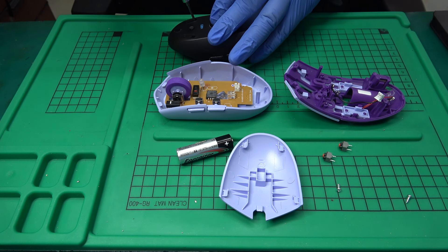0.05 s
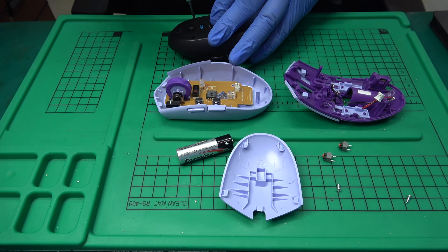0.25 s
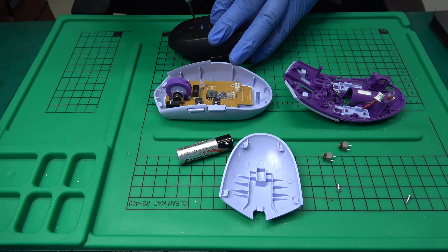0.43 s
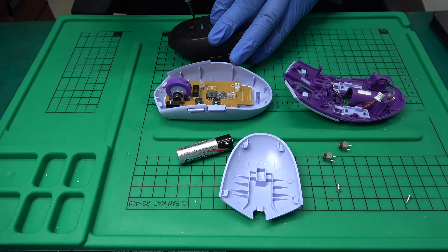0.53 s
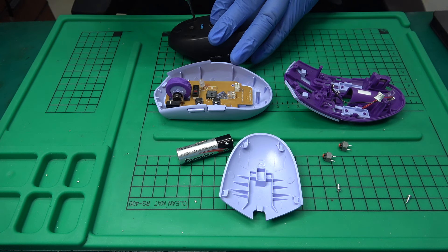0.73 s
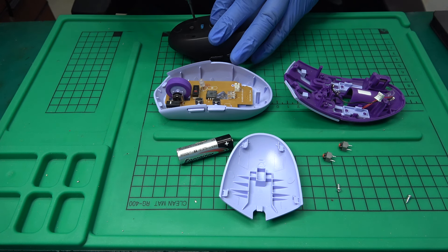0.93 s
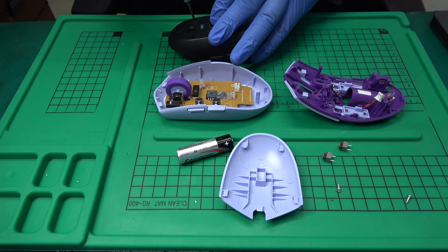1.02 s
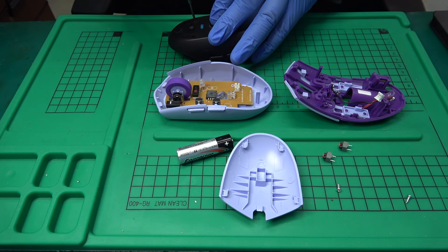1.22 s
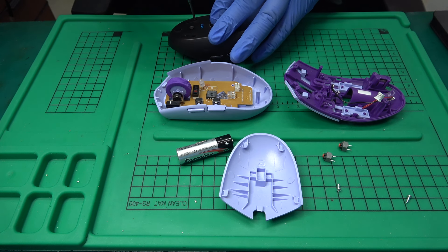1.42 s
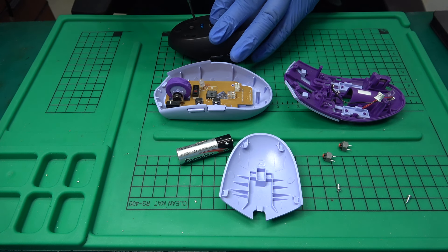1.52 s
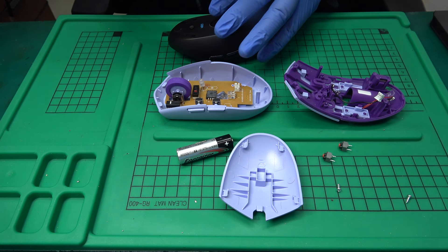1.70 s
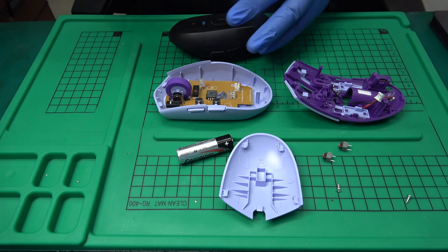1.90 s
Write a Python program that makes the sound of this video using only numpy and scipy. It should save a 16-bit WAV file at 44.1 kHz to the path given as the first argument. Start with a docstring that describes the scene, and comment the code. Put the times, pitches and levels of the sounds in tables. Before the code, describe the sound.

Close to the microphone, a computer mouse scrapes over a rubber mat in two short, hollow, hissing strokes. Between them come plastic ticks and a sharp knock that thumps the desk. A faint hum fills the small room.

```python
"""A plastic computer mouse slides twice across a rubber work mat, close by, pushed by a gloved hand.
Its feet hiss on the mat's fine grain and set the hollow shell ringing, while the air gap under it sings.
Between strokes the mouse is lifted, rattles, ticks and is set down with a knock that thumps the desk.
The feet catch on grit and squeak once. A faint hum fills the small room."""
import sys
import numpy as np
from scipy import signal
from scipy.fft import rfft, irfft, next_fast_len
from scipy.io import wavfile

SR = 44100
rng = np.random.default_rng(int(sys.argv[2]) if len(sys.argv) > 2 else 0)


def dump(signal):
    """Clip the signal to [-1, 1] and save it as 16-bit WAV at the path in sys.argv[1]."""
    limited = np.clip(np.atleast_2d(signal).T, -1, 1)
    pcm = np.round(limited * 32767).astype(np.int16)
    wavfile.write(sys.argv[1], SR, pcm)


N = 85995

# the hand's push in a stroke that dies away at the start, then in two full ones: (time [s], level [dB])
FADING_PUSH = [(-.01, -40), (.015, -42), (.05, -54.5), (.10, -63), (.15, -73.5)]
FIRST_PUSH = [(.17, -64), (.184, -38.5), (.208, -33), (.235, -33), (.30, -33), (.42, -34.5), (.55, -32.5),
              (.58, -39.5), (.605, -63), (.64, -68)]
SECOND_PUSH = [(1.022, -78), (1.036, -36), (1.051, -38.5), (1.064, -28.5), (1.13, -29.5), (1.25, -30),
               (1.45, -32.5), (1.675, -34), (1.705, -40), (1.735, -56), (1.77, -70)]
# tone of the feet rubbing on the mat: (frequency [Hz], level [dB])
FRICTION_COLOUR = [(150, -5), (600, -10), (1000, -1.5), (1800, -7.5), (2200, 5), (2700, -15), (2950, -2),
                   (3500, 2), (4000, -2), (4900, 4.5), (5350, -3), (5800, 0.5), (7800, -2.5), (9150, -0.5),
                   (9700, -10), (11000, -7.5), (11700, -5), (13300, -9.5), (15700, -12)]
# notes of the rubbed shell, whose strength depends on the hand's grip:
# (frequency [Hz], width [Hz], level in grip 0 [dB], level in grip 1 [dB], level in grip 2 [dB])
SHELL_RESONANCES = [(1303, 170, 5, 3, 3), (1660, 50, -4, 7.5, -7), (2087, 184, -1, 6, 2.5),
                    (2476, 50, 11.5, 14, 10.5), (2646, 38, 7.5, 8.5, 6), (3600, 380, -10, 2.5, -15),
                    (4270, 130, 5.5, 7.5, 12.5), (4486, 56, 4.5, -4, -9), (4645, 21, -8, -15, 15.5),
                    (4800, 230, -2, 3.5, 2.5), (7200, 82, -26, -4, 0), (8140, 73, -5, 5, -8),
                    (9050, 160, -11, 4, -4)]
# the air gap's note, which sinks as a stroke slows: (time [s], pitch [Hz])
AIR_GAP_PITCH = [(.2, 2600), (.32, 2655), (.45, 2610), (.56, 2511), (1.06, 2602), (1.2, 2635), (1.36, 2560),
                 (1.5, 2468), (1.66, 2310), (1.72, 2118)]
# tone of the room's steady noise, then the notes of its hum: (frequency [Hz], level [dB])
ROOM_NOISE_COLOUR = [(22, -9.5), (48, -1), (100, -2.5), (150, -10), (240, -8), (320, -14), (550, -19.5),
                     (1000, -23), (2000, -31.5), (4000, -37.5), (9000, -42.5), (16000, -48)]
HUM_NOTES = [(98, -57.5), (220, -51.5), (1370, -70.5), (2750, -71), (11900, -74)]
# knocks on the shell, which rings shorter while pressed on the mat: (time [s], ring level [dB],
# pitch the struck spot favours [Hz], crack level [dB], ring length [share of the free ring])
SHELL_KNOCKS = [(.0005, -19.5, 1260, -57, 0.68), (0.2154, -8.5, 1390, -36, 0.29),
                (.578, -26, 1350, -60, 0.4), (.628, -36, 1330, -70, 0.54), (.7564, -16, 1370, -21, 0.58),
                (0.7606, -30, 1390, -48, 1), (0.7734, -21, 1340, -43, 0.51), (.958, -38, 2190, -56, 0.49),
                (.969, -14, 1750, -37, 0.54), (0.974, -30.5, 1600, -59, 0.63), (1.0507, -40, 1500, -18, .5),
                (1.0557, -6.5, 1450, -33, 0.47), (1.0604, -19, 2570, -12, 1)]
# notes of the knocked shell: (frequency [Hz], level [dB], time to fade by 60 dB [s])
SHELL_MODES = [(360, -10.5, 0.1), (820, -15, 0.055), (976, -15.5, 0.033), (1175, -9, 0.051),
               (1363, -8, 0.096), (1556, 0.5, 0.03), (1579, -11, 0.084), (1880, -32, .016),
               (2484, -10.5, 0.055), (2670, -7.5, 0.034), (3200, -10.5, .012), (3830, -12.5, 0.03),
               (4870, -5.5, 0.013), (6300, -2, 0.0079)]
# ticks of the button, then catches of the feet on grit: (time [s], level [dB])
BUTTON_TICKS = [(.152, -31.5), (1.0088, -30.5), (1.027, -56)]
GRIT_CATCHES = [(.543, -22.5), (.549, -23.5), (.609, -41), (1.488, -28), (1.562, -36), (1.673, -21.5),
                (1.679, -34)]
# tone of a crack, a tick, a catch and the room's echo: (frequency [Hz], level [dB])
CRACK_COLOUR = [(200, 4), (400, -6), (650, -6), (1300, 4), (2500, 4), (3400, -7.5), (4500, -17),
                (6500, -0.5), (9000, -3), (12000, -5.5), (16000, -11)]
TICK_COLOUR = [(500, -7), (2400, -8), (3200, -2.5), (4500, 0.5), (6100, 11), (7500, -2.5), (9000, -7.5),
               (16000, -18)]
CATCH_COLOUR = [(1000, -7), (3000, 6), (5000, 11), (7000, 0), (9600, 15.5), (11500, -4), (16000, -5)]
ECHO_COLOUR = [(100, -23), (1400, 8), (5000, 5.5), (9000, 0.5), (16000, 0)]
# the desk takes the mouse's weight: (time [s], level [dB])
DESK_THUMPS = [(0.773, -29.5), (1.052, -20), (1.071, -14)]
# notes of the desk top: (frequency [Hz], level [dB], time to fade by 60 dB [s])
DESK_NOTES = [(64.6, -7, 0.28), (99, 2, 0.12)]
# a foot's squeak: (time [s], half length [s], pitch [Hz], level [dB])
FOOT_SQUEAKS = [(1.118, 0.021, 3520, -36.5)]
# stereo width of the close mouse, then of the room: (frequency [Hz], side minus middle [dB])
MOUSE_SPREAD = [(150, -10), (450, -13), (740, -15), (1220, -31), (2000, -54), (3300, -33), (4300, -46),
                (5500, -13.5), (9000, -21), (15000, -13)]
ROOM_SPREAD = [(60, -31), (130, -6), (290, -18), (640, -16), (1400, -20.5), (3100, -28), (6800, -3.5),
               (15000, -0.5)]
# how the sound leans to one side: (frequency [Hz], left minus right [dB])
BALANCE = [(30, 3.5), (95, -6), (160, 0), (270, -1), (400, 3.5), (740, 4), (1220, 0.5), (2000, 0),
           (5500, 0), (15000, 1.2)]

GRAINS_PER_S, GRAIN_SPREAD_DB, LARGEST_GRAIN_DB, ROUGHNESS_DB = 14000, 2.5, 8, 0.43
TREBLE_FROM_HZ, TREBLE_DB, TREBLE_AT_PUSH_DB = 8100, -6.5, -13.5
GAP_WIDTH_HZ, GAP_DB, GAP_FADE_DB_PER_S, GAP_FADE_FROM_S = 140, -7.5, 8, 1.27
ROOM_NOISE_DB, HUM_WAVER_HZ = -45.5, 2.27
SPOT_FOCUS_DB_PER_OCTAVE, STRIKE_SPREAD_DB = 7, 2


def from_db(db):
    """Turn decibels into a factor to multiply by."""
    return 10 ** (np.asarray(db) / 20)


def rms_one(x):
    """Scale a signal to an average power of 1."""
    return x / np.sqrt(np.mean(x ** 2) + 1e-20)


def clock():
    """The time of each sample, in seconds."""
    return np.arange(N) / SR


def colour(x, points, power=1):
    """Shape the tone by a (frequency [Hz], level [dB]) curve; power multiplies the decibels."""
    size = next_fast_len(2 * N)
    size += size % 2
    hz, db = np.transpose(points)
    grid_hz = np.maximum(np.arange(size // 2 + 1) * SR / size, 1)
    gain = from_db(np.interp(np.log(grid_hz), np.log(hz), db))
    cepstrum = irfft(power * np.log(gain))
    # minimum phase: the filter never rings before a sound arrives
    cepstrum[1:size // 2] *= 2
    cepstrum[size // 2 + 1:] = 0
    return irfft(rfft(x, size) * np.exp(rfft(cepstrum)))[:N]


def noise(points):
    """Noise of power 1 with the given tone curve."""
    return rms_one(colour(rng.standard_normal(N), points))


def drift(hz):
    """A smooth random wobble of power 1; hz sets how fast it moves."""
    r = np.exp(-2 * np.pi * hz / SR)
    return rms_one(signal.lfilter([1], [1, -2 * r, r * r], rng.standard_normal(2 * N))[N:])


def resonate(x, hz, width_hz):
    """Let through only a narrow band around one pitch."""
    r = np.exp(-np.pi * width_hz / SR)
    feedback = [1, -2 * r * np.cos(2 * np.pi * hz / SR), r * r]
    return signal.lfilter(np.array([1, 0, -1]) * (1 - r * r) / 2, feedback, x)


def whistle(hz, width_hz):
    """A breathy note: narrow noise around a pitch that may move."""
    phase = 2 * np.pi * np.cumsum(hz * np.ones(N)) / SR
    return drift(width_hz) * np.cos(phase) + drift(width_hz) * np.sin(phase)


def fade(age, t60):
    """A level that falls by 60 dB every t60 seconds once age passes zero."""
    return np.exp(-np.minimum(np.log(1000) * np.maximum(age, 0) / t60, 20))


def ring(start, hz, t60, rise_s):
    """A struck note swells briefly and dies away."""
    age = np.maximum(clock() - start, 0)
    return np.sin(2 * np.pi * hz * age) * np.tanh(age / rise_s) * fade(age, t60)


def bursts(rows, t60, hold_s=0):
    """A level that jumps up at each (time [s], level [dB]), holds, then fades."""
    t = clock()
    return sum((t >= start) * from_db(db) * fade(t - start - hold_s, t60) for start, db in rows)


def spread(middle, other, width):
    """Left and right share one sound; a second, added to one and taken from the other, widens it."""
    side = colour(other, width)
    return np.array([middle + side, middle - side])


def grains():
    """Thousands of tiny slips of the feet on the mat."""
    size_db = np.minimum(GRAIN_SPREAD_DB * rng.exponential(1, N), LARGEST_GRAIN_DB)
    slips = from_db(size_db) * rng.choice([-1, 1], N)
    return rms_one(slips * (rng.random(N) < GRAINS_PER_S / SR))


def air_gap():
    """The air gap under the mouse sings, growing fainter late in the last stroke."""
    t = clock()
    pitch_hz = np.interp(t, *np.transpose(AIR_GAP_PITCH))
    db = GAP_DB - GAP_FADE_DB_PER_S * np.maximum(t - GAP_FADE_FROM_S, 0)
    return from_db(db) * whistle(pitch_hz, GAP_WIDTH_HZ)


def slide(push, grip):
    """One stroke: the slips hiss and ring the shell, the gap sings; grip runs from 0 to 2."""
    t = clock()
    times, levels = np.transpose(push)
    push_db = np.interp(t, times, levels)
    level = from_db(push_db + ROUGHNESS_DB * drift(hz=43)) * (t > times[0]) * (t < times[-1])
    hiss = colour(grains(), FRICTION_COLOUR)
    high_pass = signal.butter(2, TREBLE_FROM_HZ, "high", fs=SR, output="sos")
    treble = signal.sosfilt(high_pass, colour(grains(), FRICTION_COLOUR))
    treble *= from_db(TREBLE_DB + push_db - TREBLE_AT_PUSH_DB)  # pushing harder adds treble
    for hz, width_hz, *grip_db in SHELL_RESONANCES:
        hiss += from_db(np.interp(grip, [0, 1, 2], grip_db)) * resonate(grains(), hz, width_hz)
    return level * ((hiss + treble) / hiss.std() + air_gap())


def strokes():
    """The hand slides the mouse over the mat, changing its grip partway through the last stroke."""
    changing_grip = np.interp(clock(), [1.34, 1.43], [1, 2])
    return slide(FADING_PUSH, grip=0) + slide(FIRST_PUSH, grip=0) + slide(SECOND_PUSH, changing_grip)


def background():
    """A wavering hum and low room noise."""
    hum = np.zeros(N)
    for hz, db in HUM_NOTES:
        pitch_hz = hz + HUM_WAVER_HZ * drift(hz=7.07)
        hum += from_db(db) * np.sqrt(2) * np.sin(2 * np.pi * np.cumsum(pitch_hz) / SR)
    rumble = spread(noise(ROOM_NOISE_COLOUR), noise(ROOM_NOISE_COLOUR), ROOM_SPREAD)
    return hum + from_db(ROOM_NOISE_DB) * rumble


def knocks():
    """Each knock rings the shell's notes, most of all those that the struck spot favours."""
    out = np.zeros(N)
    for start, db, spot_hz, _, ring_share in SHELL_KNOCKS:
        for k, (hz, note_db, t60) in enumerate(SHELL_MODES):
            off_spot_db = SPOT_FOCUS_DB_PER_OCTAVE * abs(np.log2(hz / spot_hz))
            gain = from_db(db + note_db - off_spot_db + STRIKE_SPREAD_DB * rng.normal())
            out += (-1) ** k * gain * ring(start, hz, t60 * ring_share, rise_s=0.00037)
    return out


def cracks():
    """Hard plastic cracks at each knock, with a short fizzing tail."""
    hits = [(start, crack_db) for start, _, _, crack_db, _ in SHELL_KNOCKS]
    level = bursts(hits, t60=0.013) + from_db(-15.5) * bursts(hits, t60=0.076)
    return level * noise(CRACK_COLOUR)


def room_echo(x):
    """The small room returns a short wash of sound after 6.2 ms."""
    tail = bursts([(0.0062, 0)], t60=0.21) * rng.standard_normal(N)
    tail /= np.sqrt(np.sum(tail ** 2))
    return from_db(-14.5) * colour(signal.fftconvolve(x, tail)[:N], ECHO_COLOUR)


def ticks():
    """The button gives small, bright ticks."""
    return bursts(BUTTON_TICKS, t60=0.015, hold_s=0.0011) * noise(TICK_COLOUR)


def catches():
    """The feet catch on grit with tiny, sharp scratches."""
    return bursts(GRIT_CATCHES, t60=0.014) * noise(CATCH_COLOUR)


def desk():
    """The desk top booms briefly as the mouse lands."""
    return sum(from_db(db + note_db) * ring(start, hz, t60, rise_s=0.019)
               for start, db in DESK_THUMPS for hz, note_db, t60 in DESK_NOTES)


def squeak():
    """A foot squeaks briefly after landing."""
    out = np.zeros(N)
    for peak_s, half_length_s, hz, db in FOOT_SQUEAKS:
        swell = np.exp(-((clock() - peak_s) / half_length_s) ** 2)
        out += from_db(db) * swell * whistle(hz, width_hz=78)
    return out


def scene():
    """The mouse on its mat, the desk and the room, heard close up in stereo."""
    middle, other = (strokes() + cracks() + ticks() + catches() + squeak() for _ in range(2))
    mouse = spread(middle, other, MOUSE_SPREAD) + knocks()
    mono = mouse.mean(axis=0)
    echo = spread(room_echo(mono), room_echo(mono), ROOM_SPREAD)
    left, right = mouse + echo + desk() + background()
    return np.array([colour(left, BALANCE, power=1 / 2), colour(right, BALANCE, power=-1 / 2)])


def record(dry):
    """Cut the treble steeply above 15800 Hz."""
    return signal.sosfilt(signal.ellip(12, .1, 80, 15800, fs=SR, output="sos"), dry)


dry = scene()
out = record(dry)
dump(out)
```